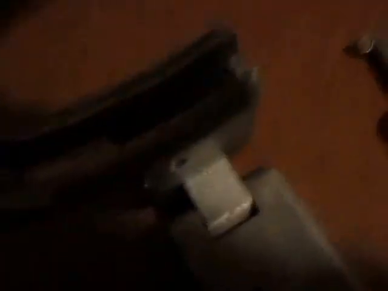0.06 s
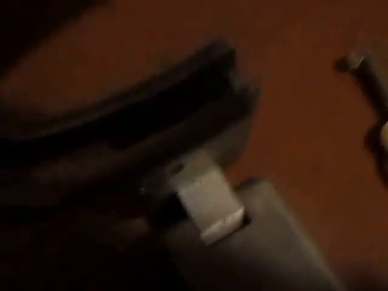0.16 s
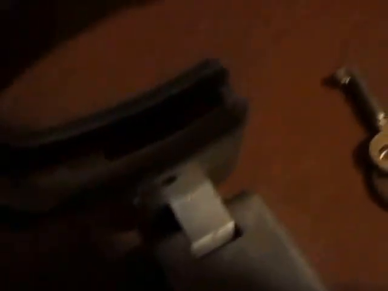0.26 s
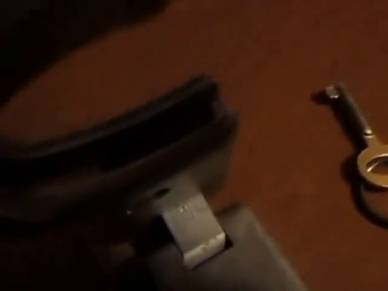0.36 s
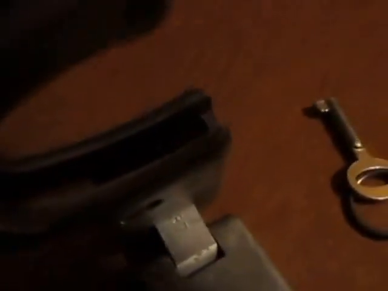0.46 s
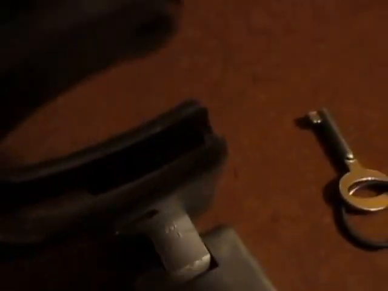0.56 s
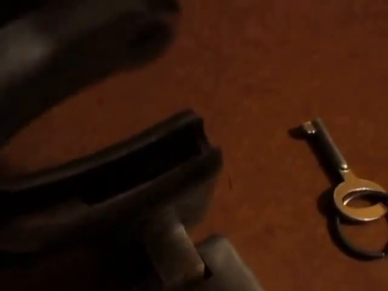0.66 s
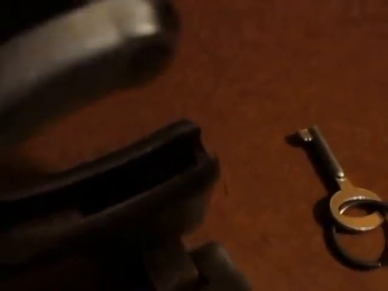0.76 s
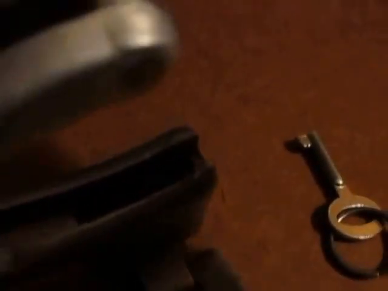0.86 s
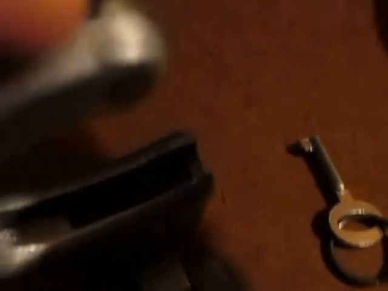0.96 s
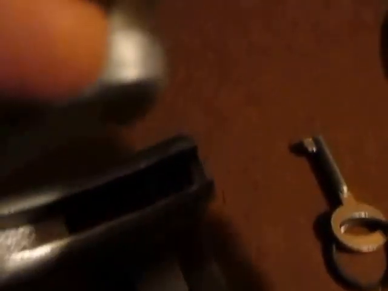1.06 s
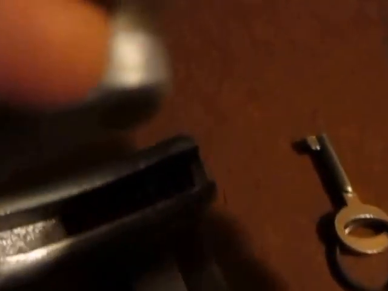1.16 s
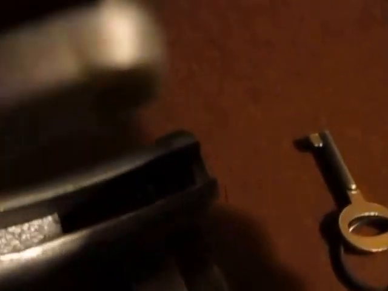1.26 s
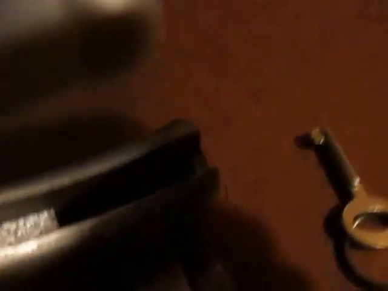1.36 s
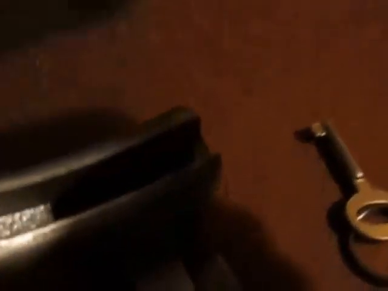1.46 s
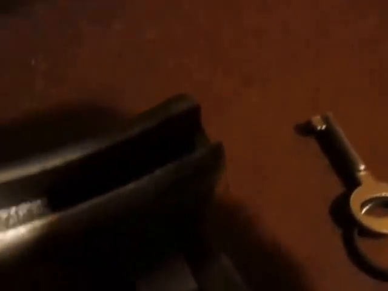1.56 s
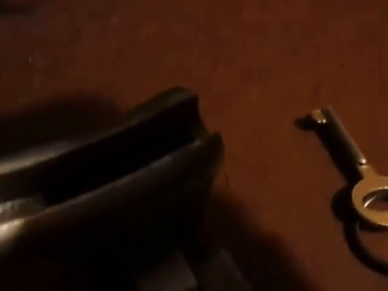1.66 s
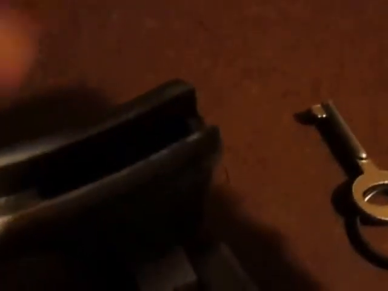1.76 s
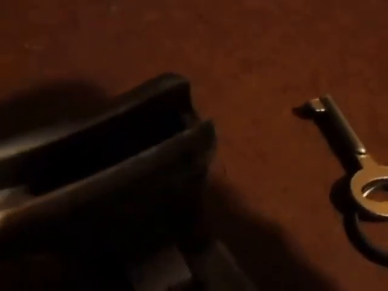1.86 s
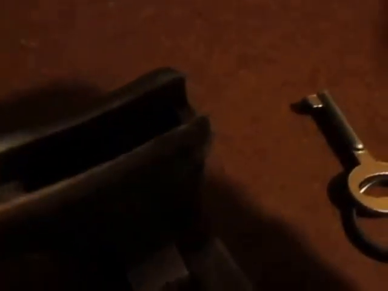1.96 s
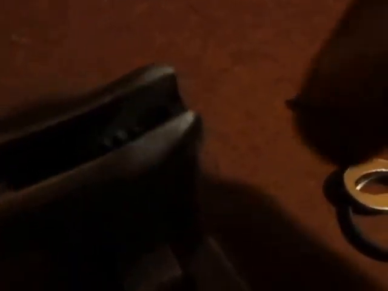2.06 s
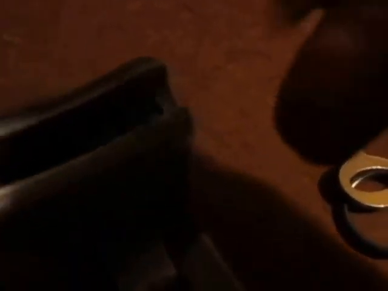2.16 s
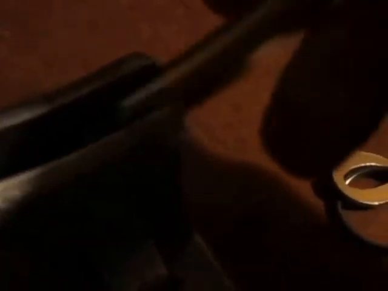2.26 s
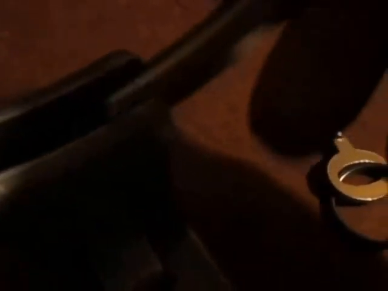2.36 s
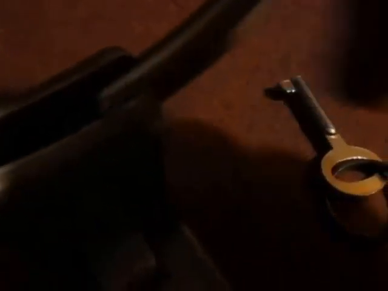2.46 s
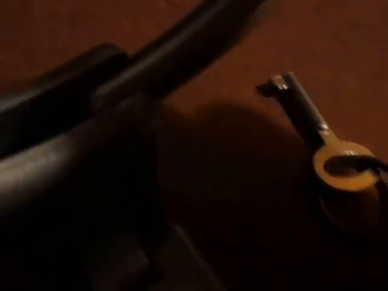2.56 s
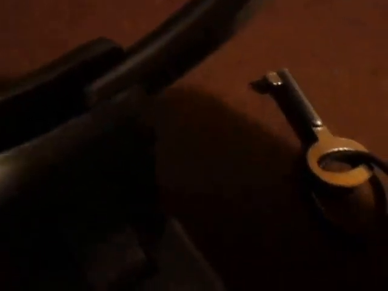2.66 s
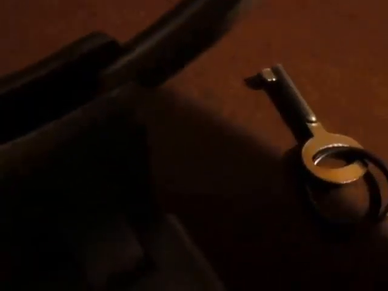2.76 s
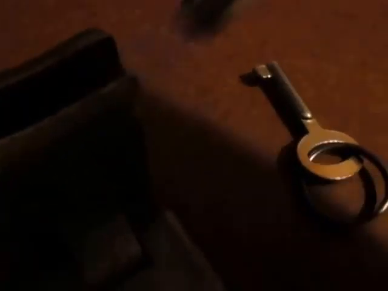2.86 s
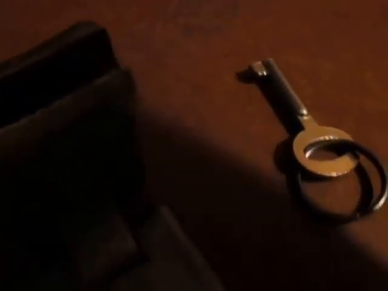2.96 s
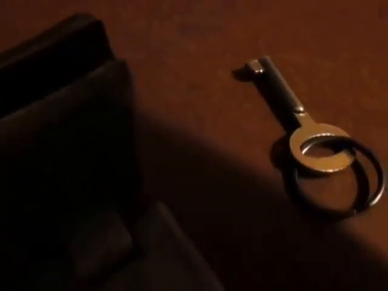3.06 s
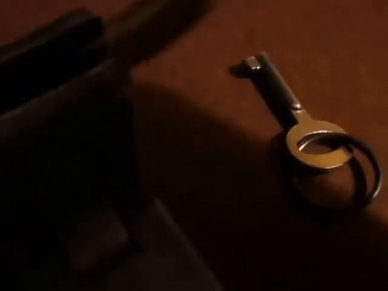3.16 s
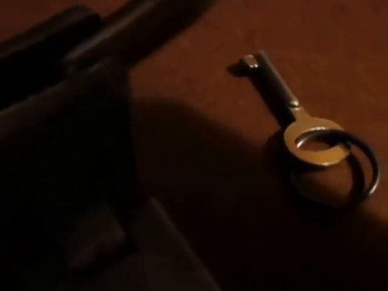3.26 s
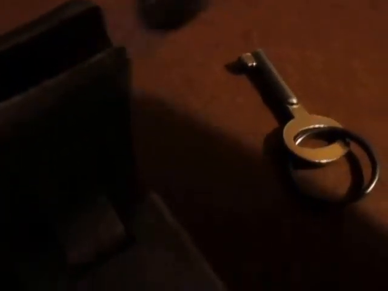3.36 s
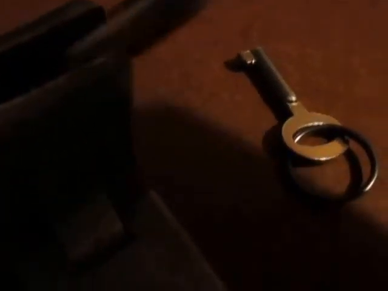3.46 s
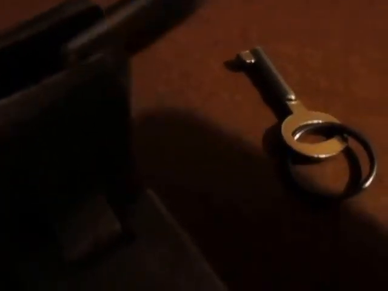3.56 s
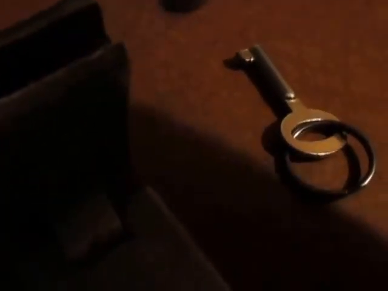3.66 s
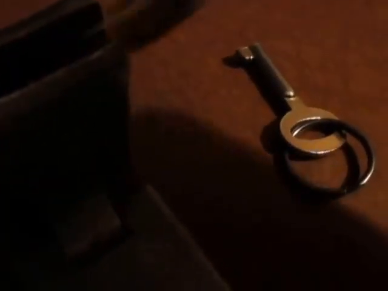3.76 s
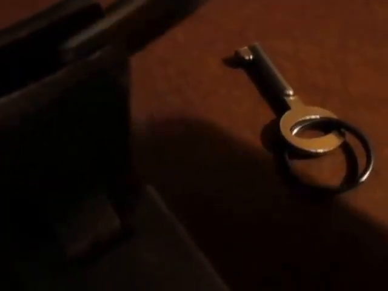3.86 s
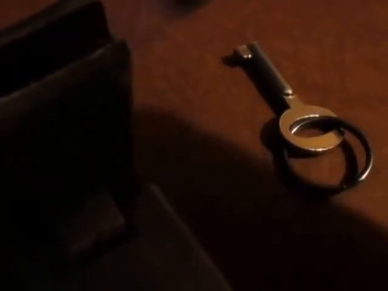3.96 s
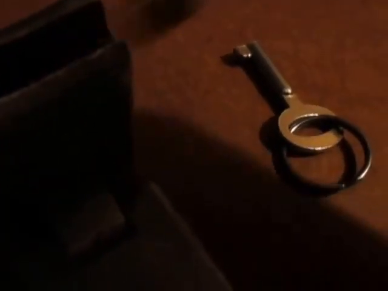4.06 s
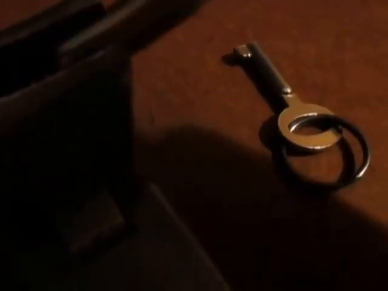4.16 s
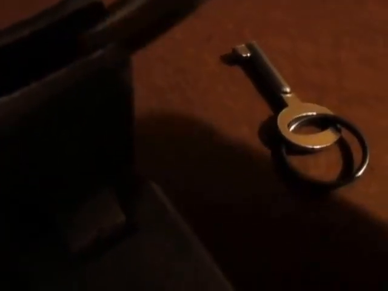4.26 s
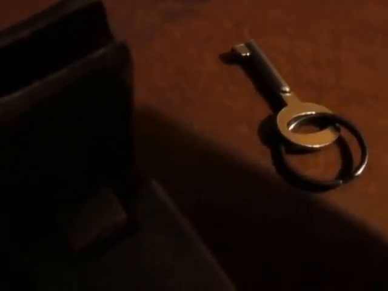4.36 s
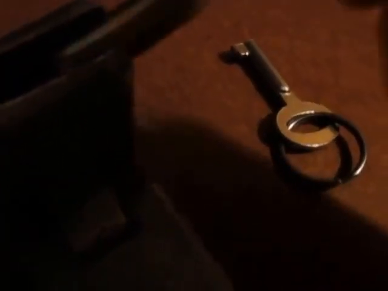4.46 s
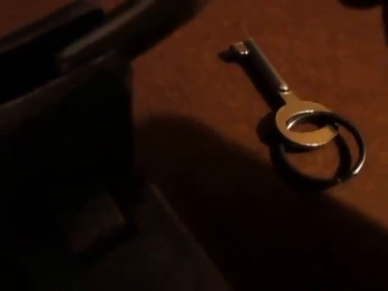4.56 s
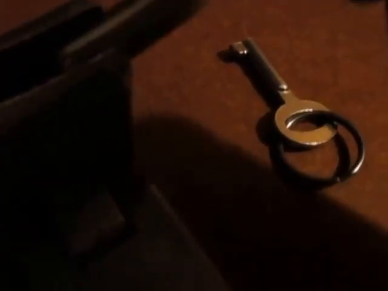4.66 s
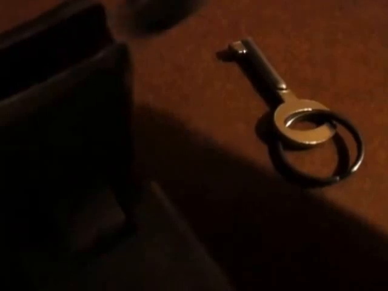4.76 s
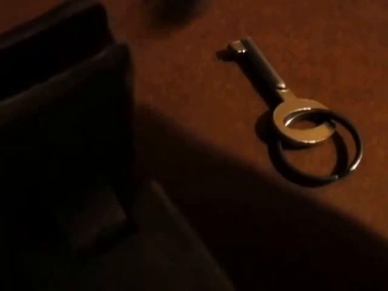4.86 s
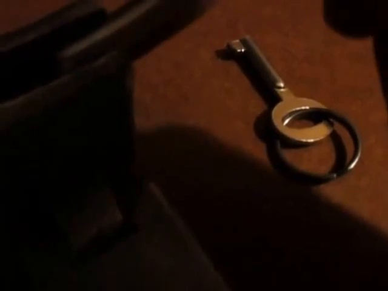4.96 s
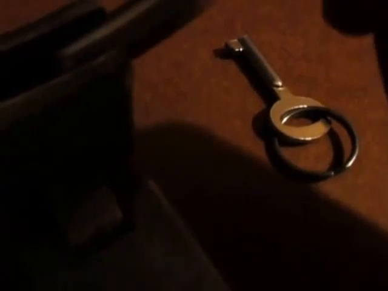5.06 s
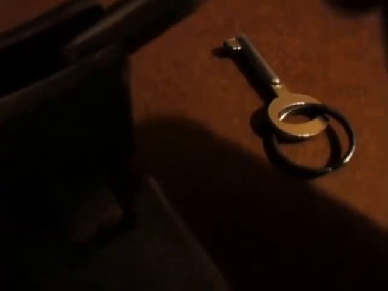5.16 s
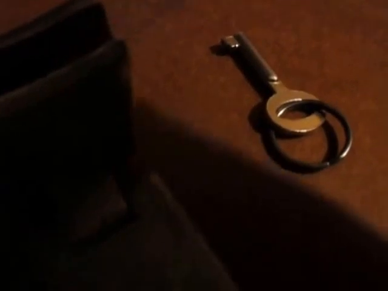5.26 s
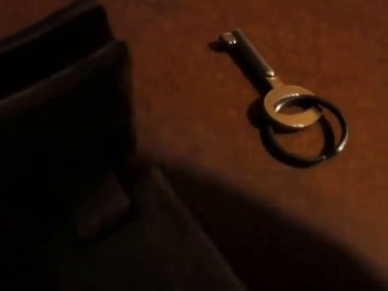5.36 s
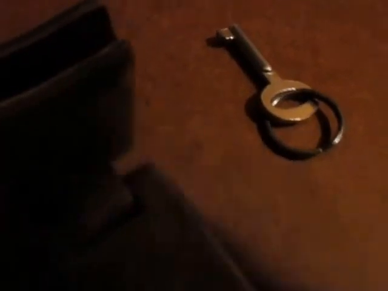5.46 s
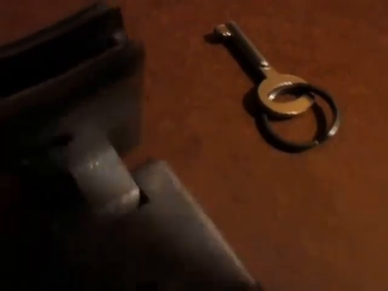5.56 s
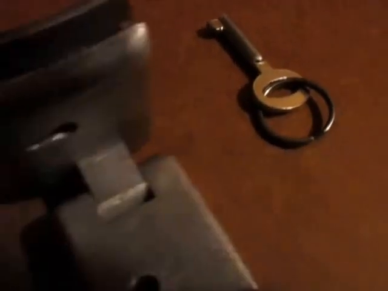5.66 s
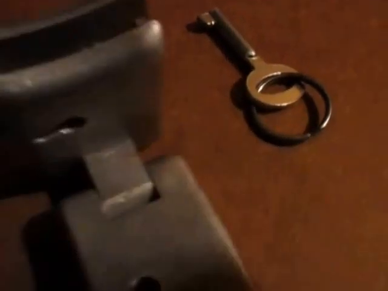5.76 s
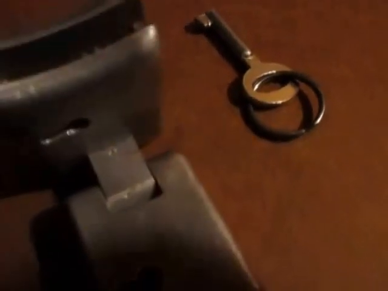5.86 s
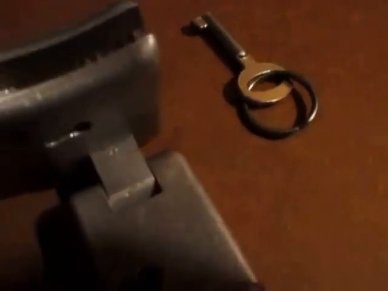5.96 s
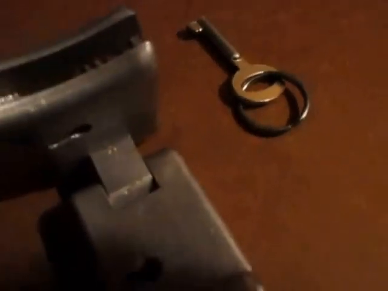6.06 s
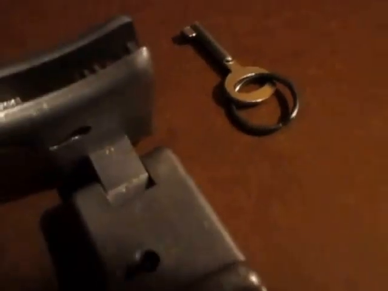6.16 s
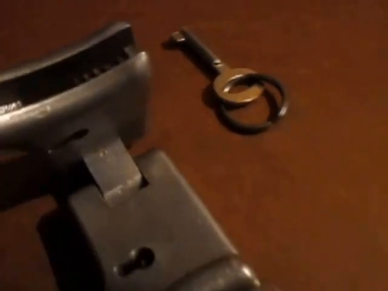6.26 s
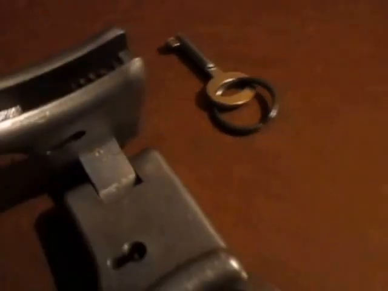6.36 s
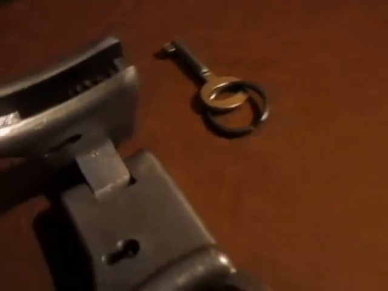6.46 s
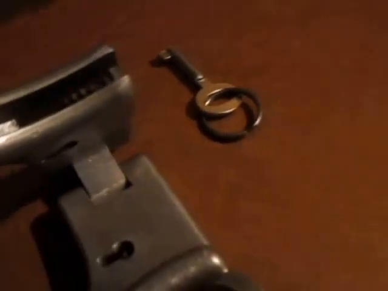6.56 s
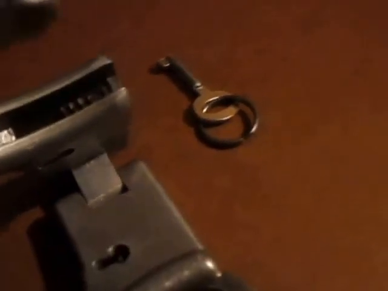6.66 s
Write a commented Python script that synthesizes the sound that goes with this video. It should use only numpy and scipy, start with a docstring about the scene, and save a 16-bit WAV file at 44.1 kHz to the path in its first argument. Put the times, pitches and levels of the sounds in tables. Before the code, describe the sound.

Close up in a small room, metal handcuffs are worked above a wooden table. A hinge clack comes first, then soft finger knocks. Seven hard, bright ratchet strokes follow, each a bite and snap almost merged, with a short rattle and table thump. Light ticks and scrapes fill the gaps. A final bump and quiet handling follow, over hiss and a fading low motor hum.

```python
"""Handcuffs worked by hand

Steel handcuffs are worked above a wooden table in a small room. Seven strokes push the bow through the lock:
a tooth bites, the last teeth snap free with a thump. Knocks, ticks, slides and rubs lie between.
Contacts are clumped noise bursts, coloured by frequency curves, plus damped modes.
A motor hums over hiss; a gain control ducks everything at loud contacts and recovers slowly."""
import sys
import numpy as np
from scipy import signal
from scipy.fft import rfft, irfft, next_fast_len
from scipy.io import wavfile
from scipy.ndimage import uniform_filter1d, minimum_filter1d, map_coordinates

SR = 44100
rng = np.random.default_rng(int(sys.argv[2]) if len(sys.argv) > 2 else 0)


def master_out(mix):
    """Clip the mix to full scale and print it as 16-bit PCM to the path in sys.argv[1]."""
    frames = np.transpose(np.atleast_2d(mix))
    ceiling = np.clip(frames, -1, 1)
    pcm = np.round(ceiling * 32767).astype(np.int16)
    wavfile.write(sys.argv[1], SR, pcm)


N = 295470
LEAD = SR // 100  # samples of a contact before its peak
AGE = (np.arange(SR // 3) - LEAD) / SR  # time since the peak [s]

# motor orders: (multiple of shaft speed, relative level [dB])
ORDERS = [(1, -20), (2, -8), (4, 3.5), (5, -7), (6, -13), (7, -40), (8, -17.5), (12, -21)]
# motor hum: (time [s], level [dB])
HUM = [(0, -39), (.9, -37.5), (2.2, -39), (3.5, -40.5), (4.6, -55), (6.7, -47.5)]
# spectrum of the room hiss: (frequency [Hz], relative level per Hz [dB])
AIR = [(20, -16), (45, -1), (110, -5.5), (220, -15.5), (350, -18), (600, -25.5), (1300, -27.5),
       (1580, -29.5), (1800, -26), (2100, -32.5), (2800, -34.5), (4000, -39), (4600, -43.5), (5500, -50),
       (7500, -77), (16000, -78.5)]
# thin tones: (frequency [Hz], level over the hiss [dB])
WHINES = [(3941, -13), (11795, -16.5)]
SHAFT_HZ, HISS_DB = 26.14, -60.5  # mean shaft speed; hiss level in 1-3.5 kHz

# slides of the bow: (middle [s], length [s], level [dB], singing mode [Hz])
SCRAPES = [(0.073, 0.0095, -50, 4880), (2.069, 0.023, -46.5, 5900), (2.445, .03, -61, 5830),
           (2.84, 0.035, -45, 4500), (3.14, 0.01, -17.5, 4400), (3.263, 0.032, -37, 5930),
           (3.365, 0.027, -41.5, 5900), (3.456, 0.02, -46, 4400), (3.54, 0.033, -43.5, 5160),
           (3.581, 0.025, -51, 4300), (4.044, .024, -52.5, 4700), (4.335, 0.0115, -48.5, 4260),
           (4.952, 0.021, -30.5, 4200), (5.274, .025, -57, 5100), (5.953, .035, -56, 5850),
           (6.272, 0.016, -50, 3770), (6.301, 0.031, -43, 5100)]
# colour of sliding and padded steel: (frequency [Hz], gain [dB])
SCRAPE_COLOUR = [(300, 13), (700, 8.5), (1400, -0.5), (1900, 11.5), (2800, 0), (4400, 0.5), (5900, -8.5),
                 (7200, -23), (9500, -28), (12000, -39), (16000, -52)]
SING_DB = -1  # singing mode, over the drag

# knocks on fingers and table:
# (time [s], knock [dB], hardness as tilt [dB per octave], plate clack [dB], table thump [dB])
KNOCKS = [(.075, -31, -10, -62, -40), (1.385, -45, 4, -62, -44), (1.508, -33, 1.5, -54, -48),
          (1.938, -40, -5, -63, -43), (2.066, -25.5, 12, -51, -39.5), (2.152, -31, 3, -55.5, -37.5),
          (2.22, -39.5, 7, -57, -44.5), (2.336, -35, 3.5, -36, -43.5), (2.436, -20, -11, -45, -50),
          (2.482, -36, -1.5, -48, -54), (2.502, -18, -4.5, -36.5, -36), (2.698, -32, 1, -51, -47.5),
          (2.842, -17, -12.5, -35.5, -22), (3.372, -23, -6, -60, -34), (3.45, -29, -12, -42, -20.5),
          (3.579, -28, -3, -45, -41.5), (3.682, -26, 0.5, -48, -31), (3.948, -26.5, -8.5, -58, -26),
          (4.065, -29, -7, -50, -30.5), (4.208, -32, 5, -52, -43.5), (4.341, -24.5, -9, -46, -29),
          (4.685, -42, 3, -67, -30.5), (4.898, -16.5, -8, -40.5, -31.5), (5.227, -30.5, -16, -52, -32),
          (5.27, -49, 0, -42.5, -45), (5.335, -34.5, -6, -53, -29.5), (5.555, -36.5, -10, -52, -48),
          (5.7117, -17.5, -12.5, -27.5, -15.5), (5.825, -33, -20, -52, -37), (5.933, -27, -24, -52, -32),
          (5.955, -40, -12, -50, -50), (6.032, -41, -14, -63, -66), (6.101, -34, -11, -67, -56),
          (6.159, -53, -3, -47, -40), (6.182, -28.5, -8, -51, -55), (6.238, -31.5, -17, -58, -35.5),
          (6.3, -28, -1.5, -39, -26), (6.324, -31, -4.5, -60, -38), (6.593, -38.5, -11, -66, -53),
          (6.616, -32.5, -14, -65, -55)]
KNOCK_CRACK_DB = -31.5  # over the knock

# modes of bow, cheek plates, low knock, table, pawl: (frequency [Hz], relative level [dB], t60 [s])
BOW_MODES = [(3763, -3, .14), (4363, -2, .1), (4724, -5, .14), (5110, -5, .12), (5830, 0, .12),
             (6390, -5, .15), (6540, -6, .15), (7980, -17, .08), (9340, -13, .08), (11500, -21, .07)]
FRAME_MODES = [(1100, 5, 0.0066), (1195, 7, 0.013), (1519.4, -4.5, 0.019), (1880, 2.5, 0.016),
               (2060, 6, 0.012), (2665, 3.5, 0.0052), (2800, -1.5, 0.002), (3450, -6, 0.0083)]
KNOCK_MODES = [(296, -9, .09), (368, -6, .075), (440, -5, .022), (603, 3, .045), (650, 2, .008),
               (710, -2, .04), (825, -7, .035)]
TABLE_MODES = [(78, -8.5, 0.033), (105, -2.5, 0.028), (134.5, -0.5, 0.17), (190, -3, 0.053),
               (218, -11, 0.013)]
PAWL_MODES = [(3970, -4.5, 0.0096), (5890, 4, 0.0082), (8237, -11, 0.0058), (9596, -5, 0.0059)]
RING_VARY_DB, RING_DETUNE = 7, .012  # spread of the bow's modes; detune as a fraction

# grip shifts: (middle [s], length [s], level [dB])
RUBS = [(0.084, 0.027, -44), (0.168, 0.1, -48.5), (2.503, 0.029, -41), (3.156, 0.015, -19),
        (4.904, 0.015, -22.5), (5.262, 0.068, -44), (5.728, 0.012, -33), (5.96, 0.039, -32.5),
        (6.26, 0.038, -34), (6.6, 0.018, -39)]
# skin on steel: (frequency [Hz], gain [dB])
SCUFF_COLOUR = [(60, 0.0), (200, 22.0), (500, 12.0), (2000, -22.5), (4000, -35.0), (8000, -52.5)]
# the thumb presses around each bite
PUSH_LEAD_S, PUSH_S, PUSH_DB = 0.0071, 0.083, -41

# hinge contacts: (time [s], level before HINGE_TRIM_DB [dB], rattle decay [s])
CLACKS = [(0.106, -33, .012), (0.1085, -9.5, 0.023), (0.1142, -12.5, 0.009), (0.1163, -11, 0.017),
          (5.709, -35, 0.017)]
# colour of the hinge: (frequency [Hz], gain [dB])
HINGE_COLOUR = [(120, -31.5), (200, -3), (386, -8), (772, -1), (2280, -4.5), (2590, 0.5), (3690, -7),
                (4250, -15), (4650, -36), (6520, -22.5), (8210, -38), (9300, -25.5), (14000, -100)]
HINGE_TRIM_DB = -9.5

# light steel contacts: (time [s], steel [dB], knock [dB], rattle decay [s], ring [Hz])
TICKS = [(2.2576, -13, -8.5, 0.017, 4550), (2.483, -48.5, -41.5, .015, 4500),
         (2.499, -43, -34, 0.012, 6170), (2.7092, -31, -20, 0.016, 3500),
         (3.042, -28.5, -15.5, 0.012, 5870), (3.1554, -17.5, -22.5, 0.015, 6000),
         (3.8693, -22, -20, 0.028, 4320), (3.9391, -42, -35, 0.022, 4340),
         (3.9688, -40.5, -34, 0.028, 4900), (4.2269, -22.5, -22.5, .012, 4290),
         (4.7051, -19, -24, 0.013, 5280), (4.7503, -30, -22.5, 0.057, 4200),
         (5.1574, -29, -27, 0.0188, 5000), (5.611, -25.5, -22.5, 0.054, 5930),
         (5.935, -61.5, -52, .015, 5820), (5.955, -59.5, -55, 0.022, 2990), (6.289, -49, -41, .015, 5050),
         (6.301, -40, -43, .018, 3900)]
# colour of ticks and catches: (frequency [Hz], gain [dB])
TICK_COLOUR = [(500, -16.5), (1500, -17.5), (2900, -10), (4600, 9), (6300, 3.5), (8000, -8.5),
               (9300, -28.5), (11500, -8.5), (13000, -31), (16500, -36.5)]
# the more steel outweighs knock, the more top, up to a ceiling
TICK_TOP_DB, TOP_PER_HARDNESS, TICK_TOP_MAX_DB = -2, 8.3, -10.5
TICK_FRAME_DB = -10.5  # over the knock
TICK_RING_DB, TICK_RING_S = -7.5, 0.033  # over the crack; t60

# pushes through the lock: (bite time [s], bite to snap [s], bite [dB], bite ring [Hz], bite knock [dB],
# snap [dB], snap ring [Hz], brightness [dB], top edge [Hz], table thump [dB],
# landing [dB], swing [dB], after-ring [Hz])
STROKES = [(2.2672, .0201, 3, 5830, -3.5, 0, 6090, -8.5, 11500, -3.5, -23, -23.5, 9400),
           (3.1944, .021, -0.5, 5866, -3, -4, 6560, 0, 13500, -2.5, -37, -20, 9450),
           (3.4782, .0247, -8, 4370, -9.5, -3, 3890, -3, 13800, -11.5, -22, -43.5, 11200),
           (3.7978, .0175, -5, 6044, -4, -4.5, 3785, 1.5, 14200, -4, -22, -48, 11500),
           (4.1083, .0144, -3.5, 4345, -6.5, -3, 6810, 0.5, 13200, -5.5, -46, -41, 7700),
           (4.4699, .012, -2.5, 4394, -3, -5.5, 5950, 2.5, 13000, -3.5, -5.5, -24.5, 5650),
           (4.9177, .0152, -4, 4200, -5, -3, 4300, -1, 12800, -14.5, -11, -27, 7700)]
# colours of bite, snap and swing: (frequency [Hz], gain [dB])
BITE_COLOUR = [(500, -5), (1500, 0), (2900, -8.5), (4300, 7.5), (5200, -3.5), (6000, -12), (7100, -11),
               (8300, -0.5), (9500, -2.5), (10800, -20.5), (12000, -13.5), (15000, -14), (16500, -35.5)]
SNAP_COLOUR = [(500, 1), (1500, -15.5), (2800, -8), (4000, -5.5), (5200, -6.5), (6500, -2.5), (9000, -9),
               (11000, -0.5), (12700, 1.5), (13800, -15.5), (14500, -24.5), (16500, -61.5)]
SWING_COLOUR = [(200, -11.5), (700, 8), (1200, 5.5), (2000, 0), (3200, -7), (6000, -6.5), (7200, -29),
                (12000, -47), (16000, -67)]
# top is before the stroke's brightness; top and ring over the crack
BITE_TOP_DB, BITE_RING_DB, BITE_FRAME_DB, BITE_DECAY_S = -21.5, -6.5, -16, 0.009
SNAP_TOP_DB, SNAP_RING_DB, SNAP_FRAME_DB, SNAP_KNOCK_DB = -9, -7, -8.5, -12.5
SNAP_RISE_S, SNAP_DECAY_S = .012, 0.016
# swing and landing are timed from the snap
SWING_LAG_S, SWING_DECAY_S, SWING_RING_DB = 0.0056, 0.13, -10.5
SWING_GRAINS_PER_S, SWING_GRAIN_DB = 320, 6
AFTER_RING_DB, AFTER_RING_S = -13.5, 0.088  # over the swing's grit; t60
LANDING_S, LANDING_FRAME_DB = 0.013, -5

# single teeth catching: (time [s], level [dB], ring [Hz], rattle decay [s])
CATCHES = [(2.2685, -7, 9390, 0.016), (2.2721, -8.5, 5800, .022), (3.1983, -10.5, 7900, 0.01),
           (3.483, -14.5, 4500, 0.015), (3.4885, -21.5, 9730, 0.0089), (3.511, -17.5, 3914, 0.012),
           (3.5238, -26, 4930, 0.012), (3.256, -36, 5930, 0.012), (3.2705, -37.5, 4200, .012),
           (3.8009, -14, 5090, 0.014), (3.8314, -31, 3280, 0.015), (4.13, -26.5, 5770, 0.016),
           (4.488, -22.5, 6200, 0.011), (4.939, -19.5, 6500, 0.025), (4.947, -24.5, 3400, .025)]
# pivot squeaks: (middle [s], length [s], level [dB], start [Hz], end [Hz])
SQUEAKS = [(2.925, .11, -52, 1930, 1780), (3.32, .06, -56, 1830, 1790), (4.318, .03, -56, 4260, 4230)]

# room decay: (frequency [Hz], t60 [s])
ROOM_T60 = [(120, 0.2), (500, 0.064), (2000, 0.091), (6000, 0.049), (14000, 0.15)]
# room colour: (frequency [Hz], gain [dB])
ROOM_COLOUR = [(100, -12.0), (500, -3.0), (1200, -9.0), (3000, -37.5), (6000, -30.5), (8000, -45), (12000, -58)]
THRESHOLD_DB, MAX_CUT_DB, RECOVERY_DB_PER_S = -20.5, 10.5, 2.5  # gain control
TOP_HZ = 16600


def amp(db):
    """Decibels to gain."""
    return 10 ** (np.asarray(db) / 20)


def unit(x):
    """Scale to rms 1."""
    return x / np.sqrt(np.mean(x ** 2) + 1e-20)


def crest(x):
    """Scale so that the loudest 3 ms have rms 1."""
    return x / np.sqrt(uniform_filter1d(x ** 2, size=132).max() + 1e-20)


def along(points, hz):
    """Read (Hz, value) points on a log frequency axis."""
    f, v = np.transpose(points)
    return np.interp(np.log(hz + 1), np.log(f), v)


def wobble(rate_hz):
    """Smooth random curve, rate_hz knots a second."""
    knots = rng.standard_normal(int(N * rate_hz / SR) + 4)
    return map_coordinates(knots, [np.arange(N) * rate_hz / SR])


def uneven(position, depth_db):
    """Random gain with one knot at each whole position."""
    knots = rng.standard_normal(int(position.max()) + 2)
    return amp(depth_db * np.interp(position, np.arange(len(knots)), knots))


def arch(middle_s, length_s):
    """Smooth bell-shaped swell."""
    return np.exp(-(2 * (np.arange(N) / SR - middle_s) / length_s) ** 2)


def filtered(x, response):
    """x times a response of frequency."""
    size = next_fast_len(len(x) + 8192)
    return irfft(rfft(x, size) * response(np.fft.rfftfreq(size, 1 / SR)), size)[:len(x)]


def add(track, s, sound):
    """Mix a contact into the track with its peak at time s."""
    start = max(round(s * SR) - LEAD, 0)
    track[start:start + len(sound)] += sound[:N - start]


def ring(modes, vary_db, detune):
    """Damped modes, with strengths and pitches drawn at random for each blow."""
    hz, db, t60 = np.transpose(modes)[:, :, None]
    level, shift = rng.standard_normal((2, len(modes), 1))
    t = np.maximum(AGE, 0)
    contact = 1 - np.exp(-(t / .0003) ** 2)  # soft onset
    decay = amp(db + vary_db * level - 60 * t / t60)
    tones = np.sin(2 * np.pi * hz * (1 + detune * shift) * t)
    return contact * np.sum(decay * tones, axis=0)


def rattle(rise_s, decay_s, lead_db):
    """Clumped noise swells into the blow, up to lead_db, then decays 60 dB in decay_s."""
    swell = amp(lead_db + 60 * np.minimum(AGE, 0) / rise_s)
    fade = amp(-60 * np.maximum(AGE, 0) / max(decay_s, .003))
    clumps = uneven(1100 * (AGE - AGE[0]), depth_db=3)
    return np.where(AGE < 0, swell, fade) * clumps * rng.standard_normal(len(AGE))


def driven(force, response):
    """Ringing of damped modes under a force."""
    return crest(signal.fftconvolve(force, response[LEAD:])[:len(AGE)])


def background():
    """A motor hums on its shaft orders, fades and partly returns; thin whines lie over steady hiss."""
    t = np.arange(N) / SR
    hum_db = np.interp(t, *np.transpose(HUM))
    turns = np.cumsum(SHAFT_HZ * (1 + .003 * wobble(4))) / SR
    hum = sum(amp(db + 0.59 * wobble(6.9)) * np.sin(2 * np.pi * (round(k) * turns + rng.random()))
              for k, db in ORDERS)
    air = filtered(rng.standard_normal(N), lambda hz: amp(along(AIR, hz)))
    air /= np.std(filtered(air, lambda hz: (hz > 1000) & (hz < 3500)))
    whine = sum(amp(db + 1.2 * wobble(6.7)) * np.sin(2 * np.pi * hz * t) for hz, db in WHINES)
    return amp(hum_db) * unit(hum) + amp(HISS_DB) * (air + np.sqrt(2) * whine)


def scrapes():
    """The bow drags between the cheek plates in uneven slips; the steel sings, one mode above the rest."""
    slips = amp(6 * wobble(450)) * rng.standard_normal(N)
    grit = unit(filtered(slips, lambda hz: amp(along(SCRAPE_COLOUR, hz))))
    # pressure of the sliding parts damps the bow's ring
    damped = ring(BOW_MODES, vary_db=2, detune=.001)[LEAD:] * amp(-60 * AGE[LEAD:] / .15)
    singing = signal.fftconvolve(slips, damped)[:N]
    singing = unit(filtered(singing, lambda hz: 1 / (1 + (hz / 6500) ** 20)))
    drag = unit(amp(6) * grit + singing)
    flutter = amp(SING_DB) * wobble(300)
    t = np.arange(N) / SR
    return sum(amp(db) * arch(s, length_s) * (drag + flutter * np.sin(2 * np.pi * hz * t))
               for s, length_s, db, hz in SCRAPES)


def low_knock(tilt_db_per_octave=0):
    """Hollow knock on stable low modes; a negative tilt favours the lowest, a positive one the highest."""
    modes = [(hz, db + tilt_db_per_octave * np.log2(hz / KNOCK_MODES[0][0]), t60)
             for hz, db, t60 in KNOCK_MODES]
    return crest(ring(modes, vary_db=1.5, detune=.012))


def thump():
    """Dull answer of the table: its low modes."""
    return crest(ring(TABLE_MODES, vary_db=1.5, detune=.015))


def frame(force):
    """The riveted cheek plates clack under a force."""
    return driven(force, ring(FRAME_MODES, vary_db=3, detune=.02))


def bow_ring():
    """After-ring of the bow, with mode levels and slight detune drawn at random."""
    return crest(ring(BOW_MODES, vary_db=RING_VARY_DB, detune=RING_DETUNE))


def steel(force, colour, top_db, pawl_db, ring_db):
    """Crack with a slightly random colour for each hit, a separate top, pawl ping and bow ring."""
    crack = filtered(force, lambda hz: amp(along(colour, hz)) * uneven(hz / 400, depth_db=3))
    top = filtered(crack, lambda hz: 1 - 1 / (1 + (hz / 10000) ** 24))
    ping = crest(ring(PAWL_MODES, vary_db=2.5, detune=.004))
    lower = crest(crest(crack - top) + amp(pawl_db) * ping + amp(ring_db) * bow_ring())
    return lower + amp(top_db) * crest(top)


def knock(tilt_db_per_octave, frame_db, steel_db):
    """One padded blow: the low knock modes answer, the steel barely rings."""
    force = rattle(rise_s=0.0025, decay_s=0.026, lead_db=-2)
    # modes driven by the noise smear the clean knock
    smear = driven(force, low_knock(tilt_db_per_octave))
    smeared = crest(low_knock(tilt_db_per_octave) + amp(-7) * smear)
    padded = filtered(smeared, lambda hz: 1 / (1 + (hz / 1200) ** 4))
    crack = steel(force, SCRAPE_COLOUR, top_db=-45.5, pawl_db=-26, ring_db=-29)
    return padded + amp(frame_db) * frame(force) + amp(steel_db) * crack


def knocks():
    """The cuffs bump fingers and table: padded blows, each with a table thump."""
    out = np.zeros(N)
    for s, knock_db, tilt_db_per_octave, clack_db, thump_db in KNOCKS:
        blow = knock(tilt_db_per_octave, clack_db - knock_db, KNOCK_CRACK_DB)
        add(out, s, amp(knock_db) * blow + amp(thump_db) * thump())
    return out


def rubs():
    """Skin drags over steel and stirs the low knock modes, around each bite and when the grip shifts."""
    pushes = [(s - PUSH_LEAD_S, PUSH_S, PUSH_DB) for s, *_ in STROKES]
    pressure = sum(amp(db) * arch(s, length_s) for s, length_s, db in RUBS + pushes)
    drag = amp(4 * wobble(200)) * rng.standard_normal(N)
    hollow = unit(signal.fftconvolve(drag, low_knock()[LEAD:])[:N])
    scuff = unit(filtered(drag, lambda hz: amp(along(SCUFF_COLOUR, hz))))
    return pressure * unit(hollow + amp(9.0) * scuff)


def hinge():
    """The hinge grazes its stop, drops and bounces twice; it drops again as the cuffs are laid down."""
    out = np.zeros(N)
    for s, db, decay_s in CLACKS:
        force = rattle(rise_s=0.0042, decay_s=decay_s, lead_db=-20.5)
        clack = crest(filtered(force, lambda hz: amp(along(HINGE_COLOUR, hz))))
        add(out, s, amp(db + HINGE_TRIM_DB) * clack)
    return out


def tooth(hz, t60_s):
    """Ping of one steel mode at the given pitch, with a slight random detune."""
    return crest(ring([(hz, 0, t60_s)], vary_db=0, detune=.003))


def tick(steel_db, knock_db, decay_s, ring_hz):
    """Light steel contact with a brief ring; hard ones are brighter."""
    force = rattle(rise_s=0.008, decay_s=decay_s, lead_db=-8.5)
    top_db = min(TICK_TOP_DB + TOP_PER_HARDNESS * (steel_db - knock_db), TICK_TOP_MAX_DB)
    crack = steel(force, TICK_COLOUR, top_db, pawl_db=-9.5, ring_db=-33)
    crack = crack + amp(TICK_RING_DB) * tooth(ring_hz, TICK_RING_S)
    dull = low_knock(tilt_db_per_octave=-3.0) + amp(-6) * thump() + amp(TICK_FRAME_DB) * frame(force)
    return amp(steel_db) * crack + amp(knock_db) * dull


def ticks():
    """Pawl and swivel tick as the cuffs are turned and the bow is set again."""
    out = np.zeros(N)
    for s, steel_db, knock_db, decay_s, ring_hz in TICKS:
        add(out, s, tick(steel_db, knock_db, decay_s, ring_hz))
    return out


def bite(bite_db, ring_hz, knock_db, bright_db):
    """The first tooth hits the pawl: sharp crack, ping and hollow low knock."""
    force = rattle(rise_s=0.005, decay_s=BITE_DECAY_S, lead_db=-12.5)
    crack = steel(force, BITE_COLOUR, BITE_TOP_DB + bright_db, pawl_db=-7.5, ring_db=-39.5)
    crack = crest(crack + amp(BITE_RING_DB) * tooth(ring_hz, t60_s=0.02))
    hollow = low_knock(tilt_db_per_octave=2.0) + amp(-12.5) * thump()
    return amp(bite_db) * crack + amp(BITE_FRAME_DB) * frame(force) - amp(knock_db) * hollow


def snap(ring_hz, bright_db, edge_hz):
    """The last teeth rattle past and the bow flies free: band-limited crack, ping, clack and knock."""
    force = rattle(rise_s=SNAP_RISE_S, decay_s=SNAP_DECAY_S, lead_db=-14.0)
    crack = steel(force, SNAP_COLOUR, SNAP_TOP_DB + bright_db, pawl_db=-18.5, ring_db=-45.5)
    crack = filtered(crack, lambda hz: 1 / (1 + (hz / edge_hz) ** 40))
    ping = amp(SNAP_RING_DB) * tooth(ring_hz, t60_s=0.018)
    hollow = amp(SNAP_KNOCK_DB) * driven(force, low_knock(tilt_db_per_octave=4))
    return crack + ping + amp(SNAP_FRAME_DB) * frame(force) + hollow


def swing(after_hz):
    """The freed bow rattles on between the cheek plates in separate grains and rings out."""
    grains = uneven(SWING_GRAINS_PER_S * (AGE - AGE[0]), depth_db=SWING_GRAIN_DB)
    force = rattle(rise_s=0.0066, decay_s=SWING_DECAY_S, lead_db=-3.5) * grains
    grit = filtered(force, lambda hz: amp(along(SWING_COLOUR, hz)) * uneven(hz / 250, depth_db=4))
    after_ring = amp(AFTER_RING_DB) * tooth(after_hz, AFTER_RING_S)
    return crest(grit) + amp(SWING_RING_DB) * bow_ring() + after_ring


def strokes():
    """Each stroke: bite, snap with a table thump, free swing, landing in the hand."""
    out = np.zeros(N)
    for (s, travel_s, bite_db, bite_hz, knock_db, snap_db, snap_hz, bright_db, edge_hz,
         thump_db, landing_db, swing_db, after_hz) in STROKES:
        snap_s = s + travel_s
        add(out, s, bite(bite_db, bite_hz, knock_db, bright_db))
        add(out, snap_s, amp(snap_db) * snap(snap_hz, bright_db, edge_hz) - amp(thump_db) * thump())
        add(out, snap_s + SWING_LAG_S, amp(swing_db) * swing(after_hz))
        landing = knock(tilt_db_per_octave=3, frame_db=LANDING_FRAME_DB, steel_db=-30.0)
        add(out, snap_s + LANDING_S, amp(landing_db) * landing)
    return out


def catches():
    """The pawl skips on single teeth: a crack, one ping and the driven low knock modes."""
    out = np.zeros(N)
    for s, db, hz, decay_s in CATCHES:
        force = rattle(rise_s=0.0036, decay_s=decay_s, lead_db=-10.5)
        crack = steel(force, TICK_COLOUR, top_db=-17.5, pawl_db=-8.5, ring_db=-29.5)
        crack = crest(crack + amp(0.5) * tooth(hz, t60_s=0.015))
        add(out, s, amp(db) * (crack + amp(-6.5) * driven(force, low_knock())))
    return out


def squeaks():
    """The dry pivot sings a rough, falling note as the bow swings."""
    out = np.zeros(N)
    t = np.arange(N) / SR
    for s, length_s, db, start_hz, end_hz in SQUEAKS:
        glide_hz = np.interp(t, [s - length_s / 2, s + length_s / 2], [start_hz, end_hz])
        rough_hz = glide_hz * (1 + .02 * wobble(270))
        note = np.sin(2 * np.pi * np.cumsum(rough_hz) / SR)
        out += amp(db + 3.0 * wobble(82)) * arch(s, length_s) * note
    return out


def room(x):
    """Short diffuse tail of decaying noise, drawn anew for each third of a second."""
    out = np.zeros(N + SR)
    block = SR // 3
    for start in range(0, N, block):
        hz, t, z = signal.stft(rng.standard_normal(SR // 2), SR, nperseg=256)
        decay = amp(-60 * t / along(ROOM_T60, hz)[:, None])
        tail = signal.istft(z * decay, SR, nperseg=256)[1]
        delayed = np.pad(tail, (SR // 200, 0))  # 5 ms
        wet = signal.fftconvolve(x[start:start + block], delayed / np.linalg.norm(tail))
        out[start:start + len(wet)] += wet
    return filtered(out[:N], lambda hz: amp(along(ROOM_COLOUR, hz)))


def gain_control(x):
    """Levels over the threshold cut the gain, about 20 ms ahead; it creeps back at a steady dB rate."""
    level_db = 10 * np.log10(np.abs(uniform_filter1d(x ** 2, size=132)) + 1e-12)
    regained_db = RECOVERY_DB_PER_S * np.arange(N) / SR
    wanted_cut_db = np.clip(level_db - THRESHOLD_DB, 0, MAX_CUT_DB)
    cut_db = np.maximum.accumulate(wanted_cut_db + regained_db) - regained_db
    return x * uniform_filter1d(minimum_filter1d(amp(-cut_db), size=1500), size=220)


def scene():
    """The cuffs, their room and the background."""
    cuffs = scrapes() + knocks() + rubs() + hinge() + ticks() + strokes() + catches() + squeaks()
    # the cuffs' sounds are cut below about 60 Hz
    cuffs = signal.sosfilt(signal.butter(2, 60, "highpass", fs=SR, output="sos"), cuffs)
    return (cuffs + room(cuffs) + background())[None]


def record(dry):
    """Gain control, soft rounding of the peaks, then a cut at the band limit."""
    held = gain_control(dry[0])
    rounded = held / (1 + np.abs(held) ** 6) ** (1 / 6)
    return filtered(rounded, lambda hz: hz < TOP_HZ)[None]


dry = scene()
out = record(dry)
master_out(out)
```